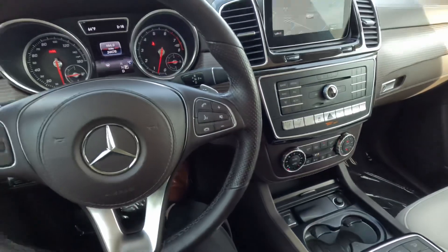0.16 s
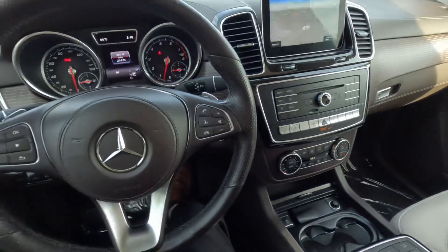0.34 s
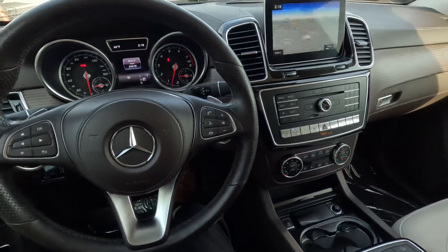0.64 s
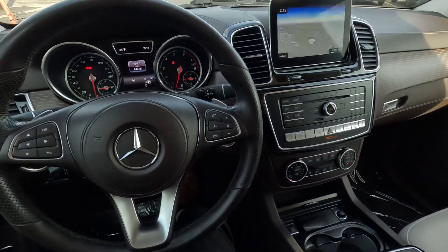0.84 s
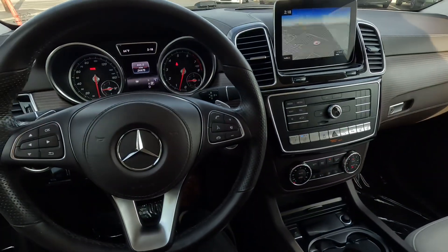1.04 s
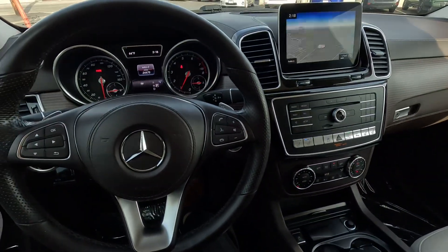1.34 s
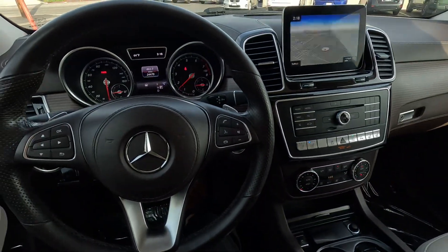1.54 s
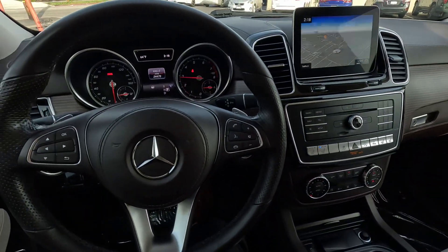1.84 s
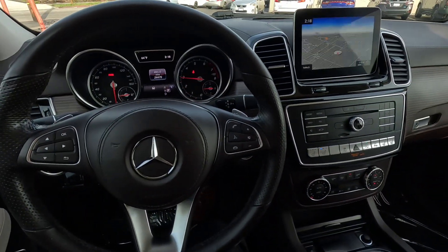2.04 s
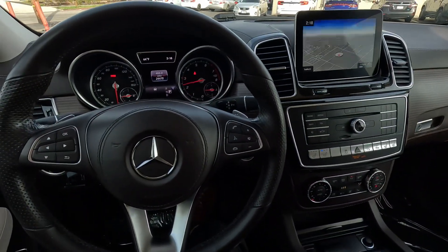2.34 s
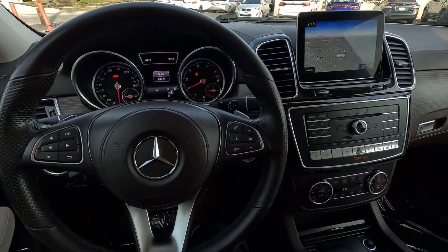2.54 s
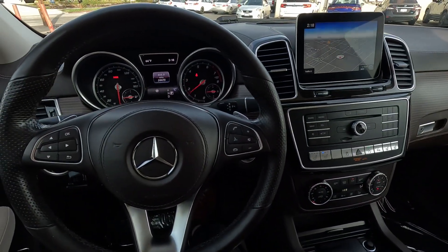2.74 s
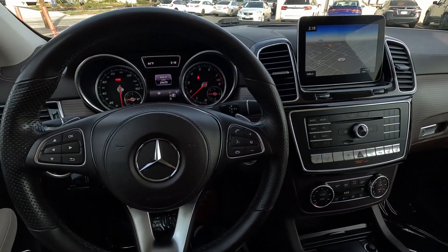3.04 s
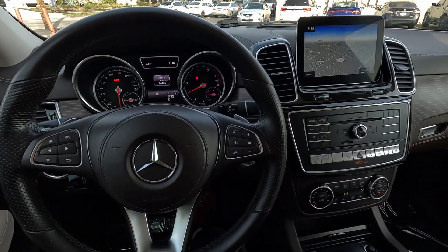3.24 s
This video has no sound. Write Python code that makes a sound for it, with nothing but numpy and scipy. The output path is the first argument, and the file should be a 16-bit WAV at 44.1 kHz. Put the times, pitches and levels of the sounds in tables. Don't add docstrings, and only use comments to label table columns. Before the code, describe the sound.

A car engine idles low inside the cabin, revs up hard, falls back, then revs again.

```python
import sys
import numpy as np
from scipy import signal
from scipy.fft import rfft, irfft, next_fast_len
from scipy.io import wavfile
from scipy.ndimage import uniform_filter1d, map_coordinates

SR = 44100
rng = np.random.default_rng(int(sys.argv[2]) if len(sys.argv) > 2 else 0)


def gain_from_db(level_db):
    decades = np.asarray(level_db, float) / 20
    return 10 ** decades


def unload_audio(sound):
    columns = np.transpose(np.atleast_2d(sound))
    steps = np.round(np.clip(columns, -1, 1) * 32767)
    wavfile.write(sys.argv[1], SR, steps.astype(np.int16))


N = 149940


def unit(x):
    return x / np.sqrt(np.mean(x ** 2) + 1e-20)


def along(points, hz):
    f, value = np.transpose(points)
    return np.interp(np.log(hz + 1), np.log(f + 1), value)


def wobble(rate):
    knots = rng.standard_normal(int(N * rate / SR) + 4)
    return map_coordinates(knots, [np.arange(N) * rate / SR])


def filtered(x, response):
    m = next_fast_len(N + SR // 2)
    return irfft(rfft(x, m) * response(np.fft.rfftfreq(m, 1 / SR)), m)[..., :N]


def peak(f, centre, width):
    return 1 / (1 + (2 * (f - centre) / width) ** 2)


def resonances(f, modes):
    return sum(db * peak(f, centre, width) for centre, width, db in modes)


# (frequency [Hz], correlation [0-1])
LIKENESS = [(60, 1), (160, 0.97), (290, 0.92), (550, 0.81), (1120, 0.66), (2980, 0.45), (7910, 0.24)]


def rush(gain):
    def mid_side(f):
        turn = np.arccos(np.clip(along(LIKENESS, f), -1, 1)) / 2
        return gain(f) * [np.cos(turn), np.sin(turn)]

    mid, side = filtered(rng.standard_normal((2, N)), mid_side)
    return unit(np.array([mid + side, mid - side]))


# (frequency [Hz], level [dB])
BODY_SHELL = [(8, -23.5), (20, -2.5), (120, -4.5), (165, -2.5), (200, -16), (500, -34)]


def cabin(f, modes):
    return gain_from_db(along(BODY_SHELL, f) + resonances(f, modes))


# (time [s], firing rate [Hz], combustion [dB], shaft shake [dB], intake roar [dB])
REVS = [(0, 30.76, -38, -51, -53), (1.04, 30.32, -40, -46, -58), (1.172, 33.28, -41.5, -50.5, -59),
        (1.302, 46.15, -37.5, -38.5, -57), (1.462, 67.65, -35, -46.5, -51.5),
        (1.598, 101.9, -38.5, -47.5, -39), (1.719, 127.1, -30.5, -37.5, -39),
        (1.809, 146.7, -43.5, -35.5, -35.5), (1.892, 155.2, -37, -40, -38), (1.971, 150.6, -38.5, -37, -45),
        (2.122, 136.4, -37.5, -36, -46), (2.502, 104.8, -50.5, -40.5, -49),
        (2.721, 83.06, -48.5, -44.5, -56), (2.903, 71.86, -50.5, -35, -53.5), (3.038, 75.97, -40, -40, -49),
        (3.188, 101, -38, -39.5, -42.5), (3.288, 116.2, -35.5, -52.5, -40), (3.4, 124.8, -34, -40, -39)]


def controls():
    s, *columns = np.transpose(REVS)
    t = np.arange(N) / SR
    return [uniform_filter1d(np.interp(t, s, c), size=SR // 25, mode="nearest") for c in columns]


def order(k, db, modes, hz, angle):
    level = gain_from_db(db + 0.7 * wobble(12.0))
    return level * cabin(k * hz, modes) * np.cos(k * angle + 0.08 * wobble(4.2))


# (centre [Hz], width [Hz], gain [dB])
CABIN_BOOMS = [(35.7, 18.5, 9.5), (61.6, 20.4, 15.5), (98.9, 9.1, 11.5), (115, 7.1, 10.5),
               (146.94, 14.1, 14)]
# (centre [Hz], width [Hz], gain [dB])
EXHAUST_PIPE = (150, 13, 5.7)
FIRING_LEVELS = [1.92, -8, -8.5, -16.5, -14.5, -11, -25.5]


def firing(hz, angle, fire_db):
    sink_db = 10.5 * np.log2(hz / hz[0])
    tones = 0
    for k, db in enumerate(FIRING_LEVELS):
        modes = CABIN_BOOMS[:-1]
        if k == 0:
            modes = CABIN_BOOMS
        elif k == 1:
            modes = CABIN_BOOMS + [EXHAUST_PIPE]
        tones = tones + order(k + 1, fire_db + db - sink_db * max(k - 1, 0), modes, hz, angle)
    return tones


CYLINDERS = 6
SHAKE_ORDERS = [2, 3, 4, 5, 7, 8, 9, 10]
SHAKE_LEVELS = [2.5, 3.5, -1, -16, -21, -9.5, -12.5, -9.5]
# (centre [Hz], width [Hz], gain [dB])
MOUNT_MODES = [(38, 9, 15), (102, 14, 15)]


def shake(hz, angle, shake_db):
    tones = 0
    for k, db in zip(SHAKE_ORDERS, SHAKE_LEVELS):
        modes = MOUNT_MODES if k < 8 else []
        tones = tones + order(k / CYLINDERS, shake_db + db + 2.2 * wobble(6.75), modes, hz, angle)
    return tones


def rock(hz, angle):
    start_s, rise_s, hold_s = 1.99, 0.06, 0.22
    t = np.arange(N) / SR
    fall_db = 55 * np.maximum(t - start_s - hold_s, 0)
    rise = np.clip((t - start_s) / rise_s + 1, 0, 1)
    return rise * order(1 / CYLINDERS, -24 - fall_db, [], hz, angle)


def rumble(shake_db):
    noise = filtered(rng.standard_normal(N), lambda f: cabin(f, CABIN_BOOMS[:-1]) ** 0.88 * (f < 400))
    return gain_from_db(-45 + 0.25 * (shake_db + 73.5)) * unit(noise)


def seat_sway():
    noise = filtered(rng.standard_normal(N), lambda f: f / (1 + (f / 16) ** 4))
    return gain_from_db(-49 + 3 * wobble(3)) * unit(noise)


# (frequency [Hz], density [dB per Hz])
INTAKE = [(110, -25), (180, 1.5), (225, -15), (278, -6), (319, -9.5), (504, -12.5), (999, -32), (1470, -37),
          (3500, -50), (4550, -87.5), (7700, -120)]
# (centre [Hz], width [Hz], gain [dB])
DASH_PANELS = [(284, 17, 3), (405, 83, 3.5), (490.5, 9.1, 9.5), (698, 32, 6.5), (1010, 150, 3),
               (1234, 190, 5.5)]


def intake_roar(angle, roar_db):
    beat = 1 + 0.3 * np.cos(angle) + 0.2 * np.cos(angle / CYLINDERS * 2)
    air = rush(lambda f: gain_from_db(along(INTAKE, f) + resonances(f, DASH_PANELS)))
    return gain_from_db(roar_db + wobble(20)) * beat * air


def engine():
    hz, fire_db, shake_db, roar_db = controls()
    first_firing_s = 0.0065
    angle = 2 * np.pi * (np.cumsum(hz) / SR - hz[0] * first_firing_s)
    orders = firing(hz, angle, fire_db) + shake(hz, angle, shake_db) + rock(hz, angle)
    tones = -np.sqrt(2) * orders
    spread = filtered(tones, lambda f: 0.045 + 0.05j + 0.09j * peak(f, 152, 30))
    middle = tones + rumble(shake_db) + seat_sway()
    return middle + spread * [[1], [-1]] + intake_roar(angle, roar_db)


# (frequency [Hz], density [dB per Hz])
FAN_AND_INJECTORS = [(88, -36.5), (150, 3), (253, -15.5), (294, -13.5), (325, -29.5), (360, -19.5),
                     (767, -33), (1290, -25), (8360, -64), (10900, -87.5), (18400, -120)]


def hum():
    hz = controls()[0]
    grow = gain_from_db(3.5 * np.log2(hz / hz[0]))
    fan = gain_from_db(-55.5 + wobble(9.9)) * rush(lambda f: gain_from_db(along(FAN_AND_INJECTORS, f)))
    whine = gain_from_db(-82.5 + wobble(7.0)) * rush(lambda f: peak(f, 1871, 16))
    hiss = gain_from_db(-85.5) * rush(lambda f: f / (1 + (f / 8000) ** 6))
    return grow * (fan + whine) + hiss


# (middle [s], length [s], level [dB], centre [Hz], width [octaves])
RUSTLE_STROKES = [(0.07, 0.22, -66.5, 3330, 2.7), (0.431, 1, -84, 3074, 1.4), (0.689, 0.13, -75, 3120, 4.3),
                  (1.295, 0.045, -74, 6390, 0.25), (0.099, 0.16, -64, 1260, 0.93),
                  (0.55, 0.073, -65.5, 1500, 1.09), (0.74, 0.0056, -56, 1320, 0.41),
                  (2.062, 0.036, -57, 1200, 0.7), (2.96, 0.024, -71, 2867, .07),
                  (1.651, 0.044, -71.5, 4590, .9), (1.837, 0.064, -69, 6060, 0.72),
                  (2.068, 0.075, -64, 3860, 2.2), (2.23, 0.039, -66.5, 4750, 1.3),
                  (2.4, 0.088, -73, 3910, 1.2), (2.622, 0.077, -73, 6440, .4),
                  (2.867, 0.096, -73.5, 5150, 1.1), (3.164, 0.053, -76, 6130, 0.28),
                  (3.378, 0.067, -68, 4480, 1.3), (3.395, 0.0089, -68.5, 7300, .3)]
# (frequency [Hz], level [dB])
CLOSE_TREBLE = [(7600, -2), (8300, -10.5), (12000, -14.5), (14000, -37)]


def cloth():
    t = np.arange(N) / SR
    out = 0
    for s, long, db, hz, wide in RUSTLE_STROKES:
        def colour(f):
            band = np.exp(-0.5 * (np.log2((f + 1) / hz) / wide) ** 2)
            return gain_from_db(along(CLOSE_TREBLE, f)) * band

        swell = np.exp(-0.5 * ((t - s) / long) ** 2)
        out = out + gain_from_db(db + 1.4 * wobble(70)) * swell * rush(colour)
    return out


# (time [s], peak [dB], centre [Hz], ring [dB], left-right [dB])
TRIM_SNAPS = [(.2315, -28, 755, -17.5, -4), (0.2306, -50, 4570, -20, 1), (0.39, -39, 970, -10, -2.5),
              (.443, -50, 4000, -27, -1), (0.4642, -34.5, 4630, -9, -5.5), (.4645, -33, 644, -16, -8),
              (.489, -59, 4000, -6.5, 4), (0.5821, -37.5, 2323, 0.5, 1.5), (1.622, -60, 4030, 3, 0),
              (1.6318, -38, 2900, -3.5, -4), (1.6391, -33, 4300, -0.5, -2)]
# (frequency [Hz], level [dB], t60 [s])
TRIM_MODES = [(890, -15, 0.033), (1242, 2, 0.02), (1802, -11.5, .04), (2044, -0.5, 0.017),
              (3245, -6.5, 0.019), (3810, 3, 0.017), (4420, -1, 0.0044), (5410, -12.5, 0.011),
              (5760, -8.5, 0.0034), (6250, -9, 0.019), (7530, -10.5, 0.0092)]
# (time [s], peak [dB], centre [Hz], ring [dB], left-right [dB])
VENT_CLICKS = [
    (1.797, -55, 2860, -9, -7),
    (1.798, -41, 7570, -5, -5),
    (3.377, -57.5, 6500, -4, 0),
]
# (frequency [Hz], level [dB], t60 [s])
VENT_MODES = [(2700, -5, 0.0074), (5250, -10, 0.027), (6060, -0.5, 0.014), (7340, -3, 0.013),
              (8300, -8.5, 0.025)]
# (frequency [Hz], left-right [dB])
PORT_LEAN = [(400, -13), (1300, -4.5), (3500, 9), (8000, 6.5)]


def clicks():
    out = np.zeros((2, N + SR))
    t = np.arange(SR // 6) / SR
    f = np.fft.rfftfreq(len(t), 1 / SR) + 1
    sides = np.array([[0.5], [-0.5]])
    fade = gain_from_db(-60 * t / 0.008) + gain_from_db(-23 - 60 * t / 0.08)
    onset = 1 - np.exp(-t / 0.00022)
    snaps = [(row, TRIM_MODES) for row in TRIM_SNAPS] + [(row, VENT_MODES) for row in VENT_CLICKS]
    for (s, db, hz, ring_db, pan_db), modes in snaps:
        def near(f):
            band = np.exp(-0.5 * (np.log2(f / hz) / 1.15) ** 2)
            return band * gain_from_db(sides * along(PORT_LEAN, f))

        noise = rng.standard_normal((2, len(t))) * 1.1 + rng.standard_normal(len(t))
        colour = near(f) * gain_from_db(along(CLOSE_TREBLE, f))
        crack = unit(irfft(rfft(noise) * colour, len(t))) * fade
        ring = 0
        for mode, level, t60 in modes:
            decay = gain_from_db(ring_db + level + rng.normal(0, 4.3) - 60 * t / t60)
            ring = ring + near(mode) * decay * np.sin(2 * np.pi * mode * t)
        snap = gain_from_db(db + sides * pan_db) * (crack + ring) * onset
        out[:, round(s * SR):][:, :len(t)] += snap
    return out[:, :N]


# (time [s], level [dB], pitch [Hz], t60 [s], left share [ratio])
GRIP_KNOCKS = [
    (.2318, -11, 313, 0.029, -0.29),
    (.39, -18.5, 268, 0.038, -0.32),
    (0.4619, -17.5, 183, 0.092, -0.36),
    (0.5827, -23, 367, 0.04, -0.081),
    (0.598, -35.5, 212.4, 0.23, -0.046),
    (.76, -40, 213.7, 0.5, -0.2),
    (0.772, -48, 404, 0.29, -0.31),
    (1.64, -17.5, 260, 0.0081, -0.66),
]


def thuds():
    out = np.zeros((2, N + SR))
    t = np.arange(SR // 3) / SR
    for s, db, hz, t60, left in GRIP_KNOCKS:
        body = np.sin(2 * np.pi * hz * t)
        body += 0.47 * np.sin(2 * np.pi * hz * 1.55 * t) * gain_from_db(-40 * t / t60)
        body += 0.47 * np.sin(2 * np.pi * hz * 1.2 * t)
        envelope = gain_from_db(db - 60 * t / t60) * (1 - np.exp(-t / (0.037 * t60)))
        out[:, round(s * SR):][:, :len(t)] += envelope * -body * [[left], [1]]
    return out[:, :N]


# (middle [s], length [s], level [dB], pitch [Hz])
LOW_SWELLS = [
    (1.268, 0.052, -26.5, 36.9),
    (1.621, 0.038, -27.5, 40.7),
    (1.904, 0.042, -27, 34.8),
    (2.42, 0.086, -31.5, 40.8),
    (2.477, 0.032, -27.5, 50.9),
    (2.671, 0.035, -24.5, 38.1),
    (3.169, 0.055, -23.5, 39.3),
    (3.292, .04, -31, 50.9),
]


def low_swells():
    t = np.arange(N) / SR
    out = 0
    for s, long, db, hz in LOW_SWELLS:
        swell = np.exp(-0.5 * ((t - s) / long) ** 2)
        out = out + gain_from_db(db) * np.sqrt(2) * swell * np.cos(2 * np.pi * hz * (t - s))
    return out


def scene():
    return engine() + hum() + cloth() + clicks() + thuds() + low_swells()


def band_limit(x):
    return signal.sosfilt(signal.butter(12, 13700, fs=SR, output="sos"), x)


def record(dry):
    return band_limit(dry)


dry = scene()
out = record(dry)
unload_audio(out)
```